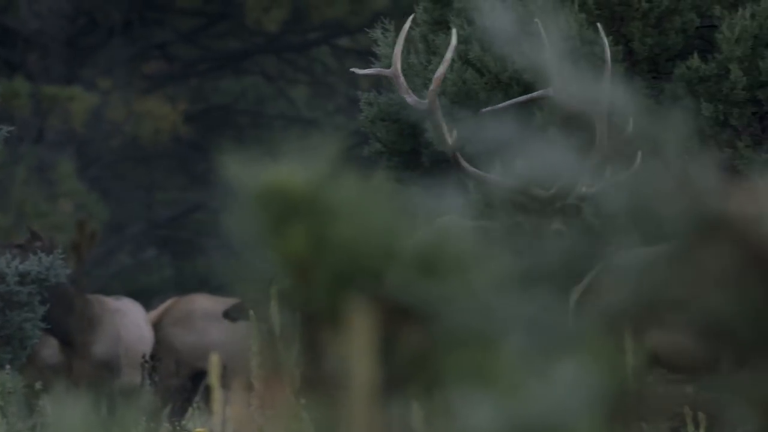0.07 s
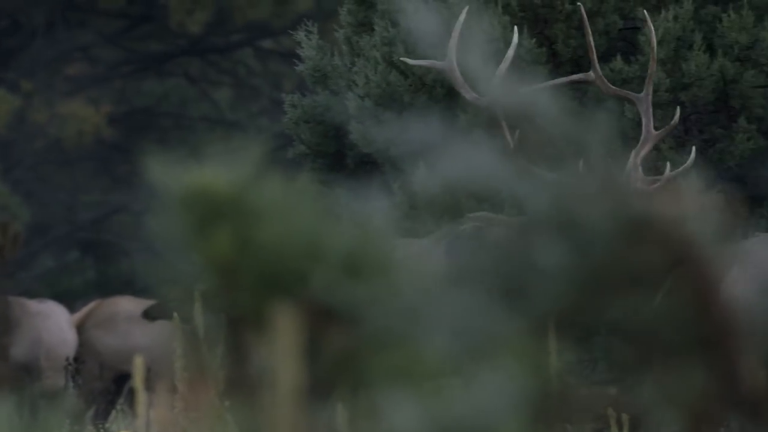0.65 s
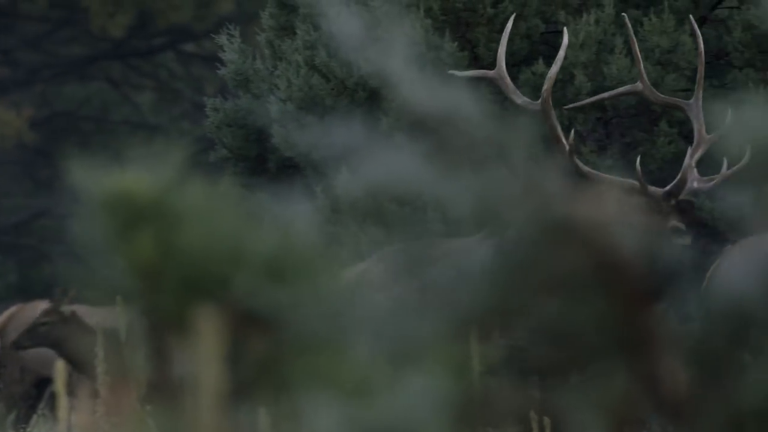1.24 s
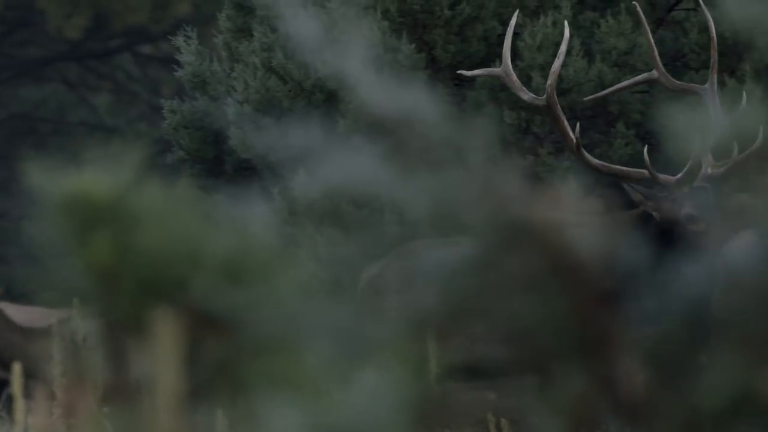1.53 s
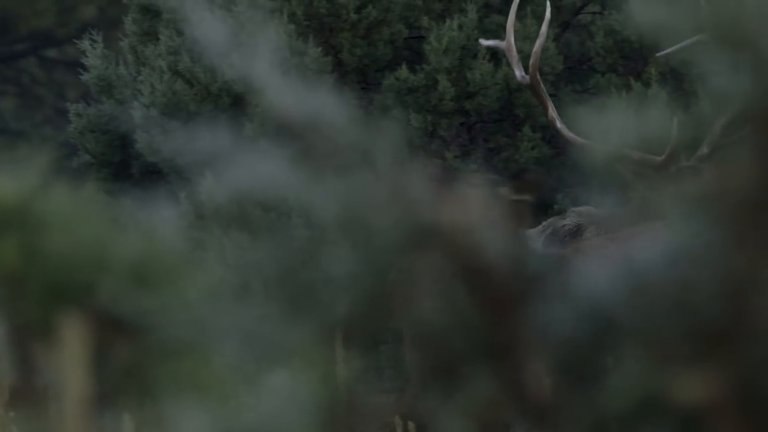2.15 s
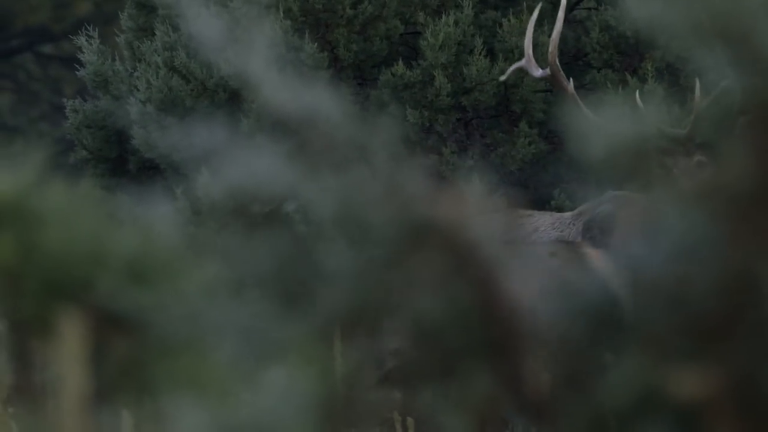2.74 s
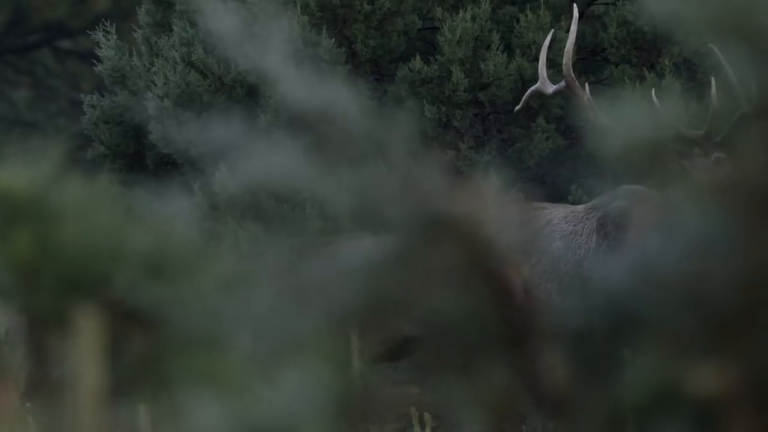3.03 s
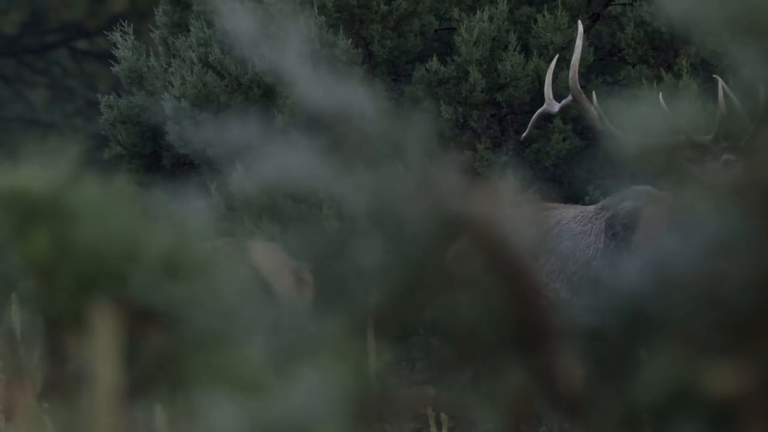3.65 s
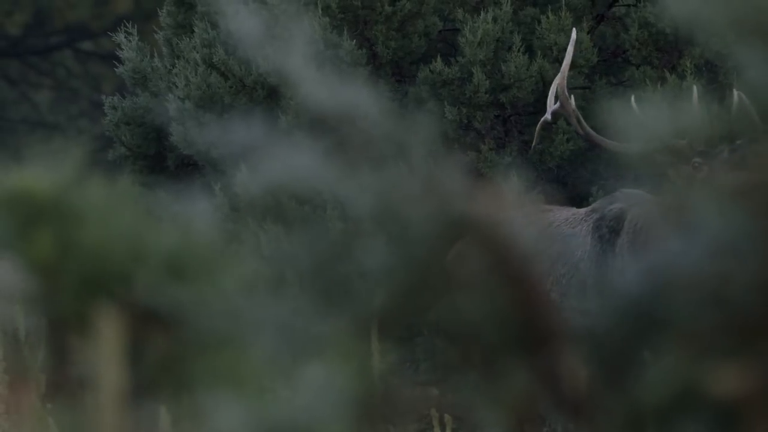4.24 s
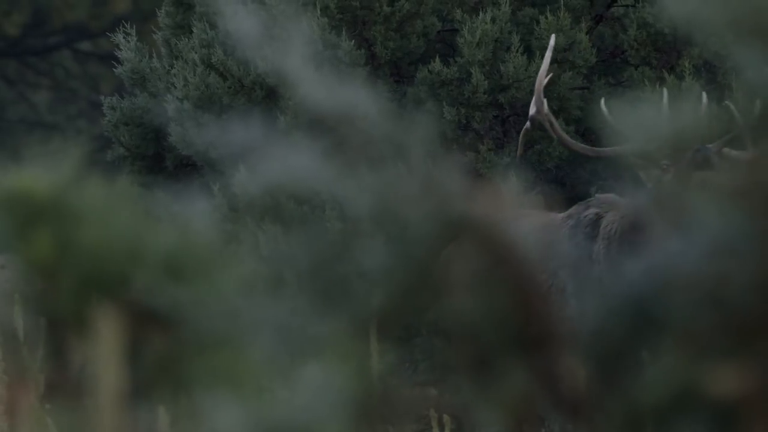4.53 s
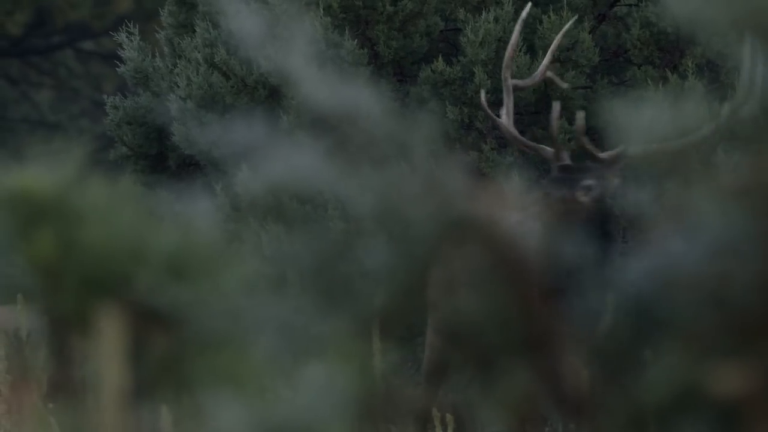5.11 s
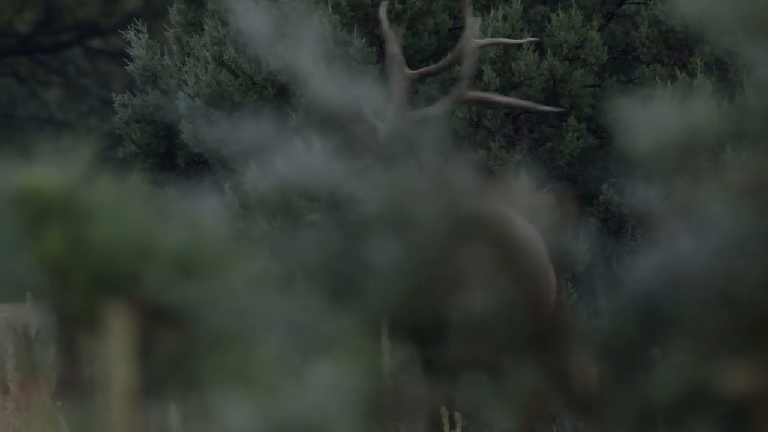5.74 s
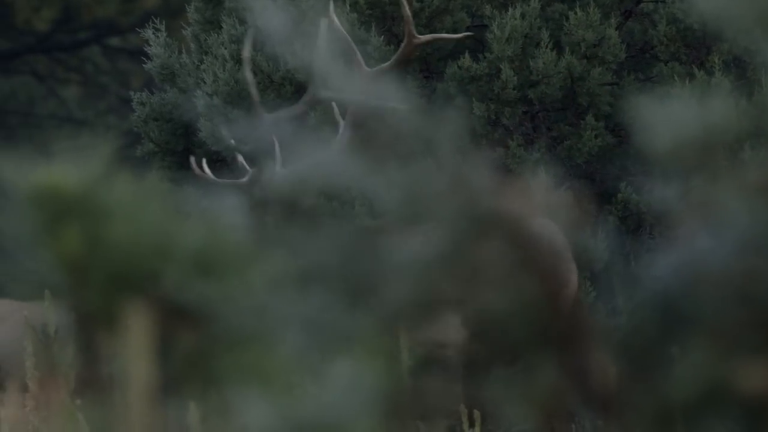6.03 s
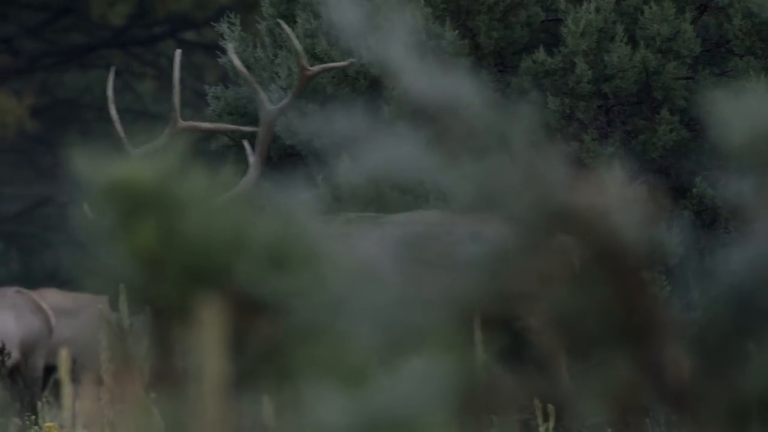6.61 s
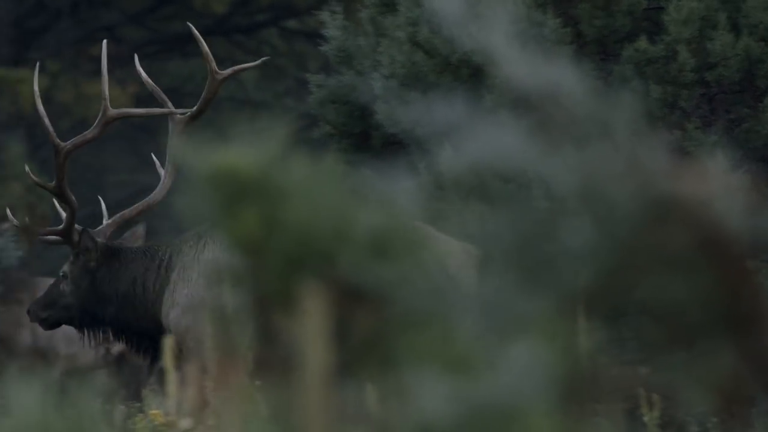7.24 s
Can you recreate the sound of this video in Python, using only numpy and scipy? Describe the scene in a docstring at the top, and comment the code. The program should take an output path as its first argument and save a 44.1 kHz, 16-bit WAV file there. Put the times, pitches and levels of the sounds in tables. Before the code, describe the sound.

Faint birdsong, soft hiss and low rumbling air fill the edge of a forest, where a distant elk mews once and a twig cracks. Close by, a bull elk starts a rising whistle that squeals and turns into a fluttering, rattling scream, growing steadily louder. It bursts into a brief piercing clear note and falls away. The echo fades among the trees, leaving the birds chirping.

```python
"""At the edge of a conifer wood a bull elk bugles close by. His whistle climbs and breaks into a squeal,
is chopped into a rattle by his slow vocal folds, then sounds free in a loud pure peak that drops away
and echoes off the slopes. Before him an earlier call dies among the trees, a farther elk mews through
the resonances of its throat, and twigs snap. Small birds call in gliding tones throughout, over a low
outdoor rumble, a hiss, a far drone and a thin whine."""
import sys
import numpy as np
from scipy import signal
from scipy.fft import rfft, irfft
from scipy.io import wavfile

SR = 44100
rng = np.random.default_rng(int(sys.argv[2]) if len(sys.argv) > 2 else 0)


def store_pcm(level_fs):
    """Save levels as 16-bit WAV."""
    pcm = np.round(np.clip(level_fs, -1, 1) * 32767).astype(np.int16)
    wavfile.write(sys.argv[1], SR, np.atleast_2d(pcm).T)


N = 320553
TIME = np.arange(N) / SR
# the bugle's stages: the whistle climbs, breaks upward, is chopped by the folds, then sounds free
CLIMB_AT_S, BREAK_AT_S, RATTLE_AT_S, FREE_AT_S = 2.991, 3.135, 3.3, 4.923
WHISTLE_HZ = 1492   # the whistle's resting pitch


def from_db(db):
    """Amplitude ratio of a level in decibels."""
    return 10 ** (np.asarray(db) / 20)


def rms_one(x):
    """Normalisation to unit rms."""
    return x / np.sqrt(np.mean(x ** 2) + 1e-20)


def noise():
    """Gaussian white noise."""
    return rng.standard_normal(N)


def band(x, low_hz, high_hz, order=2):
    """Butterworth band-pass."""
    return signal.sosfilt(signal.butter(order, [low_hz, high_hz], "band", fs=SR, output="sos"), x + 1e-18)


def drift(rate_hz):
    """Random modulation: low-passed noise of unit rms."""
    r = np.exp(-2 * np.pi * rate_hz / SR)
    return rms_one(signal.lfilter([1], [1, -2 * r, r * r], rng.standard_normal(N + SR))[SR:])


def phase_of(hz):
    """Phase is the time integral of angular frequency."""
    return 2 * np.pi * np.cumsum(hz) / SR


def since(s):
    """Seconds elapsed after a moment, zero before it."""
    return np.maximum(TIME - s, 0)


def envelope(s, attack_s, hold_s, release_s):
    """Smooth attack, hold, exponential decay."""
    attack = np.sin(np.pi / 2 * np.minimum(since(s) / attack_s, 1)) ** 2
    return attack * np.exp(-since(s + attack_s + hold_s) / release_s)


def hump(s, half_s):
    """A Gaussian pulse of height one."""
    return np.exp(-((TIME - s) / half_s) ** 2)


def swelling(rows):
    """Gain of superposed Gaussian swells."""
    return sum(from_db(db) * hump(s, half_s) for s, half_s, db in rows)


def resonate(x, modes):
    """Parallel resonators, each applied twice to deepen the valleys between them; unit rms."""
    out = 0
    for hz, width_hz, level_db in modes:
        b, a = signal.iirpeak(hz, hz / width_hz, fs=SR)
        out += from_db(level_db) * rms_one(signal.lfilter(b, a, signal.lfilter(b, a, x + 1e-18)))
    return rms_one(out)


def wood(x, t60_s, low_hz, high_hz, build_s):
    """Reverberation: countless trunks and slopes scatter sound into an exponentially decaying tail."""
    tail = band(noise(), low_hz, high_hz) * from_db(-60 * TIME / t60_s) * (1 - np.exp(-TIME / build_s))
    passband_gain = np.sqrt(np.sum(tail ** 2) * SR / (2 * (high_hz - low_hz)))
    return signal.fftconvolve(x, tail / passband_gain)[:N]


def rumble(low_db=-54.5, middle_db=-50, split_hz=300):
    """Coloured noise whose low and middle bands waver independently; a narrow low band swells at times."""
    # spectrum of the outdoor air: f/Hz, relative spectral level/dB
    spectrum = [(15, -75), (25, -40.5), (38, -29.5), (97, -12), (208, -1), (323, -8.5), (483, -2),
                (531, -2.5), (808, -12.5), (856, -12), (1060, -15), (1230, -18.5), (1800, -26.5),
                (1980, -33.5), (2400, -29.5), (3120, -54), (5280, -120)]
    # swells of the rumble: t/s, half length/s, level/dB
    swells = [(1.47, 0.25, -53.5), (2.3, 0.95, -52.5), (5.72, 0.28, -50), (6.32, 0.28, -46)]
    hz, level_db = np.transpose(spectrum)
    bin_hz = np.arange(N // 2 + 1) * SR / N
    colour = from_db(np.interp(np.log(bin_hz + 1), np.log(hz), level_db))
    air = irfft(rfft(noise()) * colour, N)
    low = signal.sosfiltfilt(signal.butter(3, split_hz, fs=SR, output="sos"), air)
    out = from_db(low_db + 3.5 * drift(6)) * rms_one(low)
    out += from_db(middle_db + drift(4.4)) * rms_one(air - low)
    return out + swelling(swells) * rms_one(band(noise(), 159, 242, order=3))


def hiss(level_db=-68):
    """Stationary broadband noise with a raised band in the low treble."""
    return from_db(level_db) * rms_one(noise() + 1.5 * band(noise(), 1500, 4500))


def drone(hz=476, level_db=-61.5):
    """A far tone, randomly modulated in frequency and amplitude, that swells twice."""
    # swells of the drone: t/s, half length/s, level/dB
    swells = [(.1, 0.14, -50.5), (.56, 0.19, -45)]
    tone = rms_one(np.sin(phase_of(hz * (1 + .0099 * drift(15)))))
    return (from_db(level_db) + swelling(swells)) * from_db(2 * drift(5.5)) * tone


def whine():
    """Two thin tones whose spectral lines are broadened by frequency jitter."""
    # tones of the whine: f/Hz, level/dB
    tones = [(1760, -69.5), (1841, -64.5)]
    return sum(from_db(db + .37 * drift(5.6)) * rms_one(np.sin(phase_of(hz * (1 + .0068 * drift(40)))))
               for hz, db in tones)


def lingering_call(end_db=-40.5, echo_db=-51.5, fade_db_per_s=12):
    """Reverberant decay: an earlier call just ends, and its echo fades among the trees."""
    # bands of the echo: f/Hz, bandwidth/Hz, relative level/dB
    bands = [(1000, 170, -0.5), (1308, 120, -2), (1547, 140, -13), (2240, 100, -16), (2540, 30, -16.5)]
    ending = from_db(end_db) * hump(0, half_s=.043) * rms_one(band(noise(), 890, 1540, order=3))
    return ending + from_db(echo_db - fade_db_per_s * TIME) * resonate(noise(), bands)


def bird_notes(rows, fall, arch, buzz, hoarse_db):
    """Frequency-modulated tones with a noisy edge; fall, arch and buzz are fractions of the pitch."""
    out, buzzing = np.zeros(N), drift(550)
    rasp = rms_one(band(noise(), 4400, 6400))
    for s, length, middle_hz, level_db in rows:
        at = (TIME >= s) & (TIME < s + length)
        progress = (TIME[at] - s) / length
        swell = np.sqrt(np.sin(np.pi * progress))
        hz = middle_hz * (1 - fall * (progress - .5) - arch * (2 * progress - 1) ** 2)
        tone = np.sqrt(2) * np.sin(phase_of(hz * (1 + buzz * buzzing[at])))
        out[at] += from_db(level_db) * swell * (tone + from_db(hoarse_db) * rasp[at] * swell)
    return out


def chips():
    """Short bird notes, clean because their modulation is shallow."""
    # chips: t/s, length/s, f/Hz, level/dB
    notes = [(.022, 0.048, 4200, -63), (.185, .064, 7350, -65), (.49, .051, 4160, -64),
             (.595, .055, 4200, -66), (.798, .041, 5400, -62.5), (1.295, 0.0083, 6270, -54),
             (1.52, .069, 4150, -69), (1.72, .044, 4100, -69), (3.569, .075, 10200, -63),
             (3.578, 0.042, 7700, -60.5), (5.257, 0.034, 5620, -63), (5.313, .019, 7160, -64),
             (5.719, 0.041, 3200, -56.5), (5.856, .03, 3770, -75), (5.903, 0.037, 3170, -56),
             (6.138, .027, 4200, -67), (6.268, .034, 3940, -70)]
    return bird_notes(notes, fall=.089, arch=.017, buzz=.014, hoarse_db=-21)


def twitter(low_hz=3200, high_hz=4600, level_db=-70, spread_db=.5, count=16):
    """Faint chips of far birds, uniformly distributed in time and pitch."""
    notes = [(TIME[-1] * when, .04, low_hz + (high_hz - low_hz) * pitch,
              level_db + spread_db * (2 * loud - 1)) for when, pitch, loud in rng.random((count, 3))]
    return bird_notes(notes, fall=.12, arch=.012, buzz=.02, hoarse_db=-12.5)


def thin_whistles(rise_s=.076):
    """Bird whistles whose frequency rises exponentially toward a slowly sagging limit."""
    # whistles: t/s, length/s, starting f/Hz, limiting f/Hz, sag/(Hz/s), level/dB
    notes = [(.8, .32, 6400, 7330, 500, -68), (5.655, .36, 6500, 7500, 1100, -63)]
    out, buzzing = np.zeros(N), drift(550)
    for s, length, start_hz, held_hz, sag, level_db in notes:
        at = (TIME >= s) & (TIME < s + length)
        t = TIME[at] - s
        hz = held_hz + (start_hz - held_hz) * np.exp(-t / rise_s) - sag * t
        tone = np.sin(phase_of(hz * (1 + .017 * buzzing[at])))
        out[at] += from_db(level_db) * np.sqrt(2 * np.sin(np.pi * t / length)) * tone
    return out


def chirrups():
    """Steeply falling bird notes; deep frequency modulation spreads them into buzzing sidebands."""
    # chirrups: t/s, length/s, f/Hz, level/dB
    notes = [(.907, 0.053, 4560, -57), (1.003, 0.043, 5140, -55), (1.045, .072, 4780, -56),
             (4.23, .085, 4540, -57), (4.329, 0.18, 4950, -57), (5.385, .073, 4440, -55.5),
             (5.485, .065, 5100, -57), (5.55, .085, 4630, -56.5)]
    return bird_notes(notes, fall=.25, arch=.015, buzz=.086, hoarse_db=-23)


def mew(gain_db=-43, shimmer_db=4.5):
    """Source and filter: a falling cry's harmonics light up in turn as they pass throat resonances."""
    # pitch of the farther elk: t/s, f/Hz
    pitch = [(1.19, 1439), (1.25, 1300), (1.3, 1182), (1.345, 1116), (1.41, 833), (1.52, 804)]
    # response of its throat: f/Hz, relative level/dB
    throat = [(800, -28), (1100, -11.5), (1450, -10), (1700, 6.5), (2000, -12.5), (2400, -3), (2900, -21),
              (3300, -16.5), (4000, -49)]
    hz = np.interp(TIME, *np.transpose(pitch))
    jitter = .0067 + .0355 * hump(1.45, half_s=.086)   # hoarse at the end
    phase = phase_of(hz * (1 + jitter * drift(150)))
    cry = 0
    for k in range(1, 5):
        harmonic_db = np.interp(k * hz, *np.transpose(throat)) - (k + 1)   # source slope: 1 dB a harmonic
        cry += from_db(harmonic_db + shimmer_db * drift(100)) * np.sin(k * phase)
    return np.sqrt(2) * from_db(gain_db) * cry * envelope(1.14, attack_s=.09, hold_s=.2, release_s=.035)


def twigs(decay_s=.013, gain_db=12.5):
    """Snapping twigs are transients: band-limited noise with a sudden onset and exponential decay."""
    # snaps: t/s, relative level/dB, f/Hz near the top of the band
    snaps = [(1.883, -52.5, 2830), (2.806, -64.5, 7460)]
    out = np.zeros(N)
    for s, level_db, hz in snaps:
        burst = (TIME >= s) * np.exp(-since(s) / decay_s) * noise()
        out += from_db(level_db + gain_db) * band(burst, hz / 3.6, hz * .96, order=3)
    return out


def trill(at_s=1.95, step_s=.0835, hurry_s=.0007, note_s=.0536, first_hz=7050, step_hz=185,
          level_db=-53, accent_db=1):
    """A bird's train of hoarse arched glides, the first accented, each lower and sooner than the last."""
    notes = [(at_s + k * (step_s - k * hurry_s), note_s, first_hz - k * step_hz,
              level_db + accent_db * (k == 0)) for k in range(7)]
    return bird_notes(notes, fall=-.049, arch=.054, buzz=.021, hoarse_db=-2.5)


def wheezes():
    """Long bird notes of nearly level pitch, roughened by modulation and noise."""
    # wheezes: t/s, length/s, f/Hz, level/dB
    notes = [(2.5, 0.35, 3800, -55), (6.92, 0.23, 3950, -55), (7.229, 0.0645, 3900, -62)]
    return bird_notes(notes, fall=.037, arch=.014, buzz=.054, hoarse_db=-11)


def whistle(hz, octave_db, shrill_db, jitter, shimmer_db):
    """The bull's whistle is a harmonic series: fundamental, octave and shrill partials waver as one."""
    # shrill partials: harmonic number, relative level/dB
    partials = [(3, 2), (4, -19), (5, -34.5), (6, -35.5), (7, -48)]
    phase = phase_of(hz * (1 + jitter * drift(120)))
    shrill = sum(from_db(db) * np.sin(k * phase) for k, db in partials)
    octave = np.sin(2 * phase) * (.7 + .51 * drift(97))
    tone = np.sin(phase) + from_db(octave_db) * octave + from_db(shrill_db) * shrill
    return np.sqrt(2) * tone * from_db(shimmer_db * drift(95))


def slack_db(hz, taut_hz, db_per_octave=50):
    """Level follows frequency: a slack whistle is weaker as well as lower."""
    return -db_per_octave * np.maximum(np.log2(taut_hz / hz), 0)


def climb(start_hz=779, top_hz=1240, climb_s=.1, level_db=-29.5):
    """An upward glide: the whistle grows louder, and its overtones fade as it reaches its pitch."""
    risen = np.sin(np.pi / 2 * np.minimum(since(CLIMB_AT_S) / climb_s, 1)) ** 2
    hz = start_hz + (top_hz - start_hz) * risen
    pure = risen ** 8
    tone = whistle(hz, -5 - 29.5 * pure, -17.5 - 10.5 * pure, jitter=.0086, shimmer_db=1.5)
    shape = envelope(CLIMB_AT_S, attack_s=.03, hold_s=BREAK_AT_S - CLIMB_AT_S - .03, release_s=.002)
    return from_db(level_db + slack_db(hz, top_hz)) * tone * shape


def squeal(broken_hz=1442, slipped_hz=1362, end_hz=1218, sag_s=.058, level_db=-28.5):
    """Frequency jumps: the whistle yelps upward, slips a step, then sags as its shrill partials swell."""
    yelp_at_s = BREAK_AT_S + .0225
    slip_at_s = yelp_at_s + .003
    sagging_hz = end_hz + (slipped_hz - end_hz) * np.exp(-since(yelp_at_s + .0051) / sag_s)
    hz = np.where(TIME < slip_at_s, broken_hz, sagging_hz)
    opened = 1 - np.exp(-since(slip_at_s) / .006)
    shrill = .0081 + opened * (from_db(-14.5) + from_db(.5) * hump(3.228, half_s=.037))
    tone = whistle(hz, octave_db=-28, shrill_db=20 * np.log10(shrill), jitter=.0098, shimmer_db=1.5)
    yelp = 1 + from_db(9.5) * hump(yelp_at_s, half_s=.0064) + .8 * hump(3.176, half_s=.01)
    shape = envelope(BREAK_AT_S, attack_s=.0012, hold_s=.13, release_s=.074)
    return from_db(level_db) * yelp * tone * shape


def fold_rate(rest_hz=67.4, tight_hz=24, settle_s=.65, push_hz=11.6, push_s=.18):
    """Tension sets the folds' rate: they start tight, settle, and quicken for the last push."""
    unsettled = np.clip(1 - since(RATTLE_AT_S) / settle_s, 0, 1) ** 1.8
    return rest_hz + tight_hz * unsettled + push_hz * np.exp(np.minimum(TIME - FREE_AT_S, 0) / push_s)


def rattle_pitch(flat_hz=112, settle_s=.26, dip_hz=32, dip_s=.07):
    """The carrier frequency relaxes up to the resting pitch and dips as the whistle comes free."""
    return WHISTLE_HZ - flat_hz * np.exp(-since(RATTLE_AT_S) / settle_s) - dip_hz * hump(FREE_AT_S, dip_s)


def growl(fold_phase, gain_db=-47.5):
    """Low harmonics of the fold rate sound from the chest; the twelfth meets a throat resonance."""
    # chest partials: harmonic number, relative level/dB
    partials = [(2, -1.5), (3, 7), (4, -20)]
    chest = rms_one(sum(from_db(db) * np.sin(k * fold_phase) for k, db in partials))
    chest += from_db(-7.5) * np.sin(12 * fold_phase)
    return from_db(gain_db) * chest * envelope(3.48, attack_s=.22, hold_s=.92, release_s=.085)


def rattle(open_share=.576, edge_share=.29, leak=.09, flutter_db=1.6, fray=.42, hoarse_db=-14.5):
    """Amplitude modulation: the folds pass the whistle in puffs, and each puff sets the throat ringing."""
    # the bull's effort, as the whistle's level: t/s, level/dB
    effort = [(3.3, -47.5), (3.35, -38.5), (3.44, -30), (3.485, -37), (3.53, -29), (3.57, -30),
              (3.62, -24.5), (3.93, -21.5), (4.07, -17.5), (4.84, -18), (4.9, -11.5), (4.925, -7.5)]
    # three groups of throat resonances: f/Hz, relative level/dB
    lower_modes = [(490, -14.5), (815, -8.5), (1150, 3), (1320, 12)]
    upper_modes = [(1760, 13), (1890, 12), (2070, -2)]
    rasp_modes = [(2900, -1), (3250, -1), (3390, -6.5), (3740, -12.5), (4500, -23.5), (4850, -31),
                  (5700, -30), (5930, -31), (6720, -43.5), (7880, -44)]
    whistle_db = np.interp(TIME, *np.transpose(effort))
    fold_hz = fold_rate() * (1 + .005 * drift(40))
    fold_phase = phase_of(fold_hz)
    cycles = fold_phase / (2 * np.pi)
    in_cycle = cycles % 1
    strength = from_db(flutter_db * noise()[cycles.astype(int)])   # one value a puff
    opening = np.clip(np.minimum(in_cycle, open_share + edge_share / 2 - in_cycle) / edge_share, 0, 1)
    puffs = strength * np.sin(opening * np.pi / 2) ** 2
    ringing = strength * np.sin(np.pi * in_cycle ** .64) ** 2   # outlasts the puff, dies before the next

    def ring(modes):
        """Each mode restarts as the folds open, frayed by turbulence."""
        out = 0
        for hz, db in modes:
            mode = np.sin(2 * np.pi * hz * in_cycle / fold_hz)
            out += from_db(db) * (mode + fray * resonate(noise(), [(hz, 110, 0)]))
        return rms_one(ringing * out)

    phase = phase_of(rattle_pitch() * (1 + .00388 * drift(77.6)))
    hoarse = rms_one(drift(230) * np.sin(phase) + drift(110) * np.cos(phase))   # sounds on between puffs
    chopped = rms_one((puffs + leak) * np.sin(phase))
    voice = rms_one(chopped + from_db(hoarse_db) * hoarse * (1 - .3 * opening))
    octave = from_db(-8.5) * rms_one(puffs ** 2 * np.sin(2 * phase))
    surge_db = np.maximum(whistle_db + 22, 0)   # the final surge feeds the whistle, not the resonances
    upper_db = -15.5 + 10 * hump(3.62, half_s=.17)   # the throat rings most while the call builds
    voice += from_db(upper_db - surge_db) * ring(upper_modes)
    voice += from_db(-12.5 - surge_db) * ring(lower_modes)
    voice += from_db(-21.5 - surge_db) * rms_one(ring(rasp_modes) + octave)
    voice += from_db(-51) * rms_one(ringing * band(noise(), 3600, 7000))   # turbulence in each puff
    gate = np.interp(TIME, [RATTLE_AT_S - .02, RATTLE_AT_S, FREE_AT_S - .003, FREE_AT_S + .003],
                     [0, 1, 1, 0])
    return from_db(whistle_db) * voice * gate + growl(fold_phase)


def free_whistle(level_db=-5.5, fade_db_per_s=26, scoop_hz=130, scoop_s=.003, step_hz=120,
                 drop_hz=600, drop_s=.055):
    """No longer chopped, the whistle peaks, cracks down a step, gains harmonics and falls ever faster."""
    t, crack_at_s = since(FREE_AT_S), FREE_AT_S + .044
    reedy = (1 + np.tanh((TIME - crack_at_s) / .0057)) / 2
    fall_hz = drop_hz * (since(crack_at_s + .0052) / drop_s) ** 2
    hz = np.maximum(WHISTLE_HZ - scoop_hz * np.exp(-t / scoop_s) - step_hz * reedy - fall_hz, 600)
    tone = whistle(hz, -42.5 + 23 * reedy, -52 + 12.5 * reedy, jitter=.0028 + .005 * reedy, shimmer_db=1.44)
    shape = envelope(FREE_AT_S, attack_s=.005, hold_s=.054, release_s=.065)
    return from_db(level_db - fade_db_per_s * t + slack_db(hz, taut_hz=1350)) * tone * shape


def echoes(call):
    """Early reflections arrive as delayed copies; diffuse reverberation follows from trees and slopes."""
    # reflections from the ground and near trees: delay t/s, level/dB
    reflections = [(.0078, -20), (.021, -27), (.046, -31)]
    out = sum(from_db(db) * np.interp(TIME - s, TIME, call, left=0) for s, db in reflections)
    out += from_db(-20) * wood(call, t60_s=.4, low_hz=600, high_hz=5000, build_s=.01)
    out += from_db(-28) * wood(call, t60_s=3.4, low_hz=400, high_hz=3140, build_s=.22)
    # one wooded slope throws back the brighter part of the call
    return out + from_db(-18.5) * wood(call, t60_s=2, low_hz=2430, high_hz=2868, build_s=.015)


def scene():
    """Superposition of the near bull, the more reverberant callers deeper in the trees, and background."""
    bull = climb() + squeal() + rattle() + free_whistle()
    near = bull + echoes(bull)
    cry = mew()
    far = cry + from_db(-5) * wood(cry, t60_s=1.36, low_hz=600, high_hz=3530, build_s=.0024)
    song = trill() + twitter() + chips() + chirrups() + wheezes() + thin_whistles()
    far += from_db(-5.5) * song
    far += from_db(-7.5) * wood(song, t60_s=.42, low_hz=2503, high_hz=9000, build_s=.0044)
    return (near + far + lingering_call() + twigs() + rumble() + hiss() + drone() + whine())[None]


def record(dry, bass_hz=45, ceiling=.73, stop_hz=16120):
    """Band limiting and clipping: deep bass is rolled off, the loudest peaks flatten, the top is cut."""
    lean = signal.sosfilt(signal.butter(2, bass_hz, "high", fs=SR, output="sos"), dry)
    clipped = np.clip(lean, -ceiling, ceiling)
    return signal.sosfilt(signal.cheby2(16, 70, stop_hz, fs=SR, output="sos"), clipped)


dry = scene()
out = record(dry)
store_pcm(out)
```